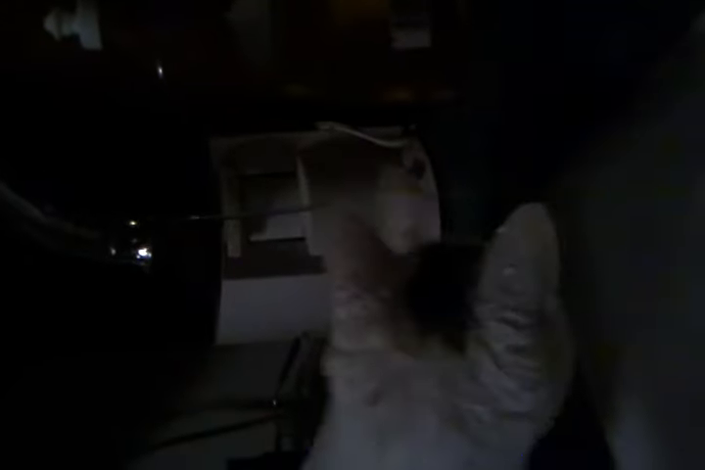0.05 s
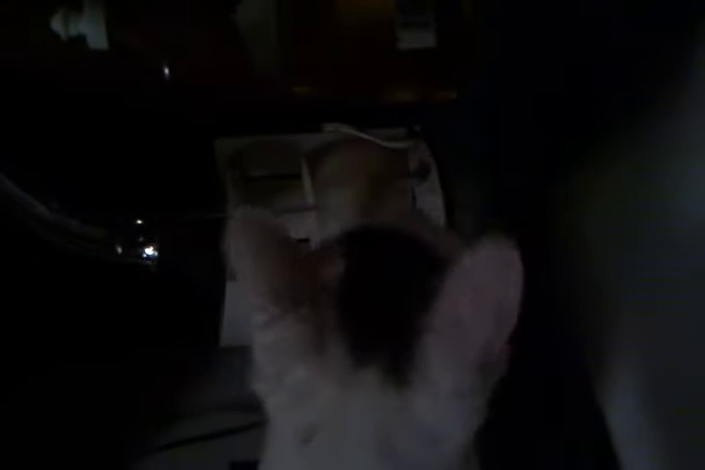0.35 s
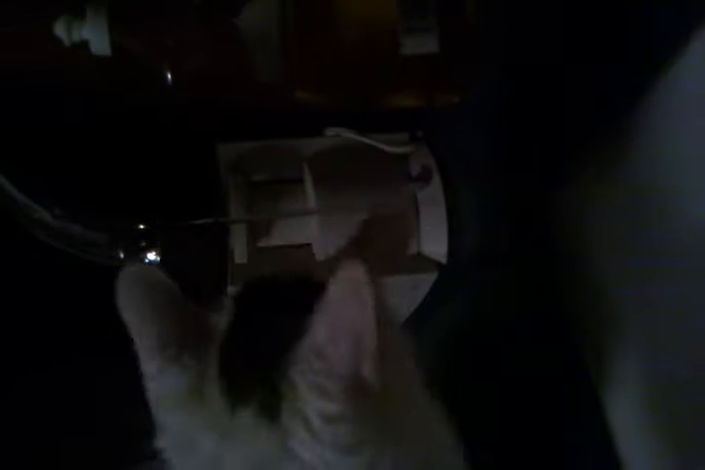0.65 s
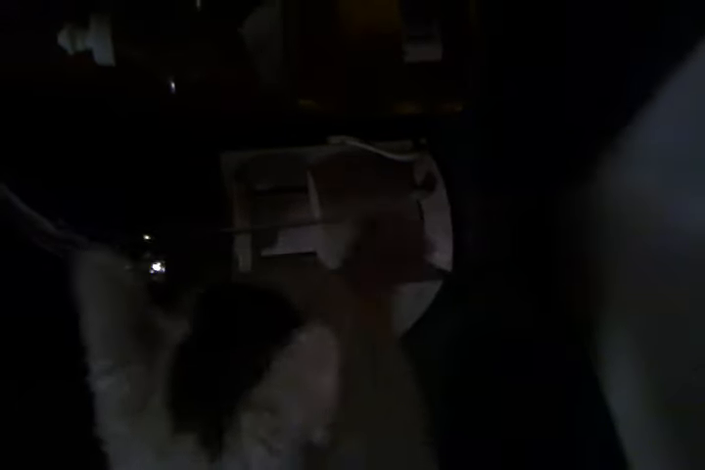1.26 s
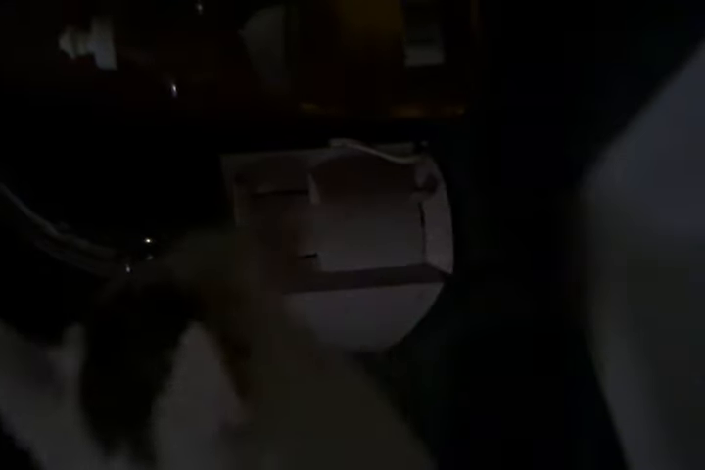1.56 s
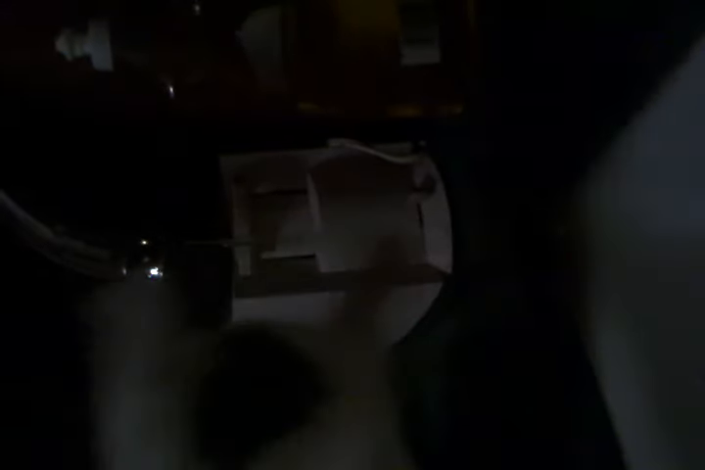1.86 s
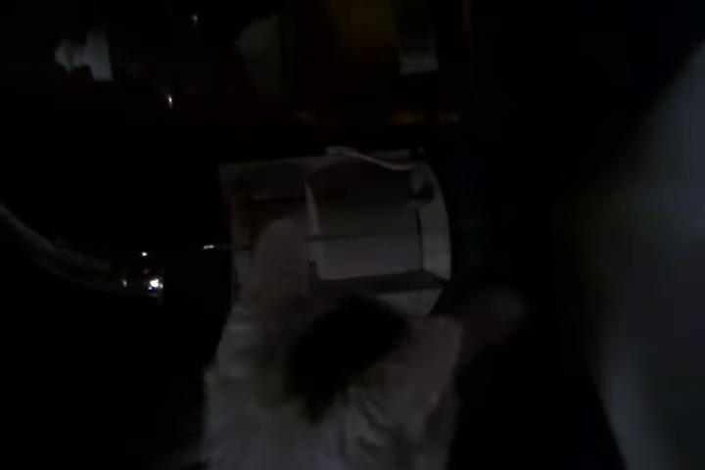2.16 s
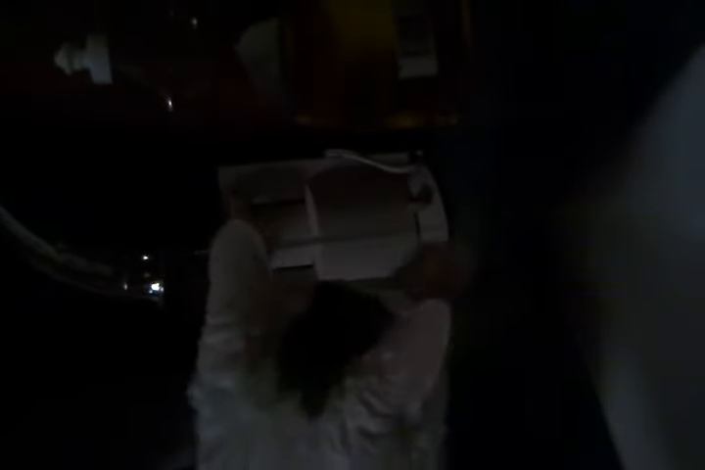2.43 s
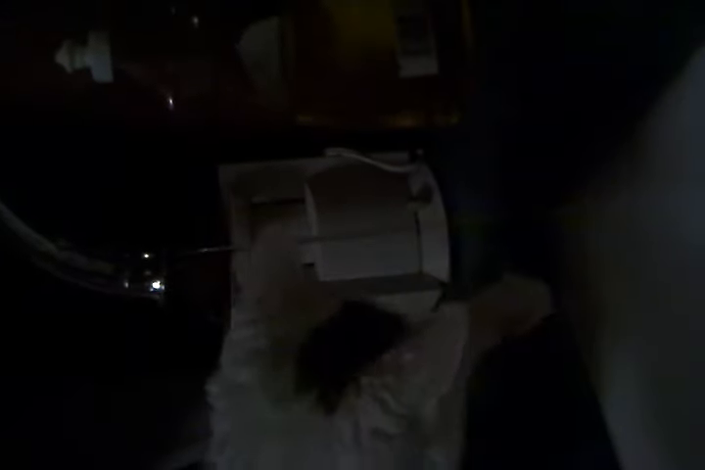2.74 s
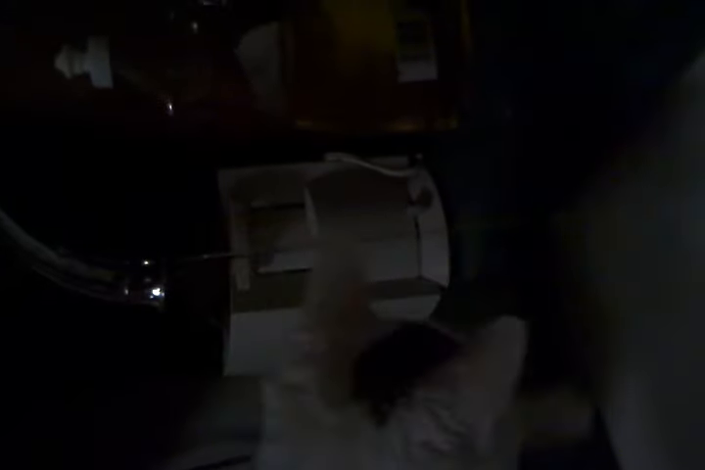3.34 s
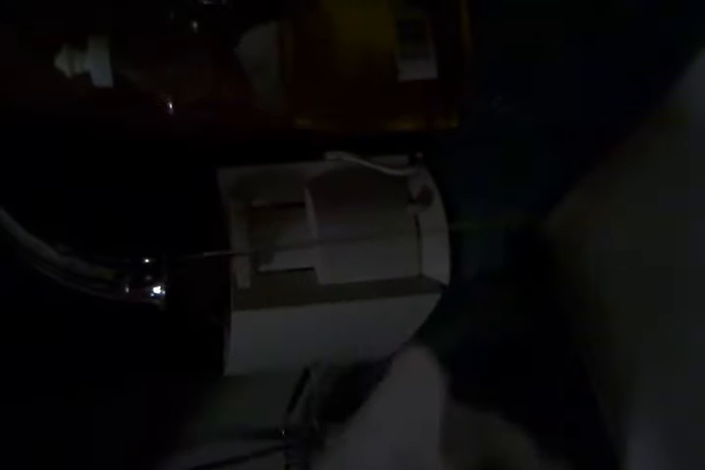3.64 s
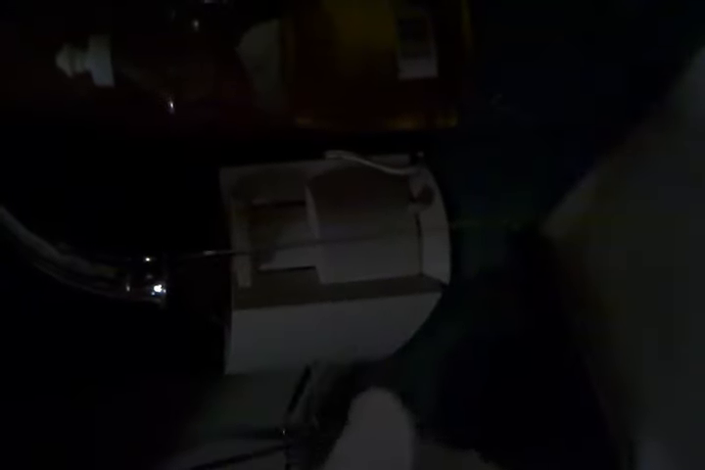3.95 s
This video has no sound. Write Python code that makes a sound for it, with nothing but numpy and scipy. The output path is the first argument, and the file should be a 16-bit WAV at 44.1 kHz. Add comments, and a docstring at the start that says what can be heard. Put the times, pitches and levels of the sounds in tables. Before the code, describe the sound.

A dripping metal tap ticks and rings faintly as a cat paws at it in a small, quiet room. Fur brushes past and dull knocks sound close by, then the cat lands on a wooden counter with a hollow thump.

```python
"""A dripping metal tap ticks and rings as a cat noses and paws at it in a small, quiet room.
Drips and light touches set the metal ringing, fur brushes past, and a few dull knocks sound.
Near the end the cat lands on the wooden counter, whose boards give a hollow thump.
A camera close by whirs and hisses faintly."""
import sys
import numpy as np
from scipy import signal
from scipy.fft import rfft, irfft
from scipy.io import wavfile
from scipy.ndimage import uniform_filter1d

SR = 44100
rng = np.random.default_rng(int(sys.argv[2]) if len(sys.argv) > 2 else 0)


def to_wav(s):
    """Save 16-bit WAV."""
    ch = np.atleast_2d(s).T  # columns
    pcm = np.round(np.clip(ch, -1, 1) * 32767)  # PCM
    wavfile.write(sys.argv[1], SR, pcm.astype(np.int16))


N = 176400

# The tones the metal tap rings at. Each row: pitch in Hz, level in dB, multiplier of the ring time.
TAP_TONES = [(5520, -4, 1), (5660, -6, .9), (6050, -5, .5), (6445, 5, .9), (6600, 0, .7), (7030, 1, 1.1),
             (7095, -2, 1.3), (7365, -4, 1.1), (7701, 1, 1.3), (8025, 1, 1.3), (8190, -1, 1),
             (8500, -4, .6), (8950, -3, .8), (9510, -4, .9), (9760, -3, 1), (10385, 1, 1.3),
             (10750, -3, .8), (11500, 0, .9), (11850, -3, .7), (12720, -3, .8), (13200, -1, .9),
             (13670, 0, 1)]
# The tone colour of splats and rubs on the tap. Each row: frequency in Hz, level in dB.
CONTACT_COLOUR = [(300, -37), (2000, -11), (2500, -11.5), (4000, -8.5), (5700, -11.5), (6500, -2.5),
                  (8000, 0), (10500, -0.5), (12000, -5), (13600, 6.5)]


def tap_ticks(rise_s=.0006, snap_t60=.0039, echo_s=.0021, basin_s=.025, basin_t60=.031):
    """Each drip or touch snaps, splats and rings the metal; a faint splash comes back from the basin."""
    # Each row: start in seconds, level in dB, centre in Hz, spread in Hz, ring time in seconds,
    # head start of the left microphone in milliseconds.
    hits = [(0.249, -42.5, 8100, 448, 0.062, 0.25), (.331, -52.5, 3960, 350, 0.021, 0.27),
            (0.339, -55.5, 3980, 350, .025, .23), (0.529, -50, 13300, 1200, 0.031, 0.26),
            (0.584, -45.5, 8200, 500, 0.045, 0.25), (.586, -46.5, 5400, 150, 0.038, 0.27),
            (0.6734, -28.5, 8150, 790, 0.0093, 0.26), (0.771, -37, 11400, 1290, 0.0089, 0.3),
            (.796, -55, 7500, 1500, 0.023, 0.4), (0.841, -53, 9000, 2000, 0.051, 0.29),
            (0.852, -55, 8800, 2000, 0.095, .28), (0.908, -46, 10300, 600, 0.048, .28),
            (0.963, -41, 10300, 700, 0.054, 0.24), (0.973, -38, 7640, 600, 0.073, 0.25),
            (1.040, -43, 13200, 600, .05, 0.34), (1.096, -50, 12200, 1950, 0.081, .28),
            (1.158, -58, 13200, 812, .05, 0.34), (1.203, -51.5, 9100, 2470, 0.02, .28),
            (1.210, -51, 8700, 2000, 0.013, 0.23), (1.3887, -32, 8500, 2000, 0.0079, 0.22),
            (1.5957, -44.5, 6440, 300, 0.07, -0.21), (1.689, -48, 12600, 1960, 0.008, .28),
            (1.7978, -29.5, 7340, 640, 0.054, -0.31), (2.009, -47.5, 8400, 2500, 0.013, 0.25),
            (2.0176, -46, 13600, 600, 0.033, 0.41), (2.0483, -39, 7130, 497, 0.076, -.2),
            (2.068, -33.5, 10400, 2860, 0.046, 0.12), (2.1735, -43, 13000, 1500, .008, 0.2),
            (2.179, -42, 6250, 650, 0.069, -0.26), (2.354, -39, 11400, 2980, 0.012, 0.25),
            (2.3668, -47, 7100, 342, 0.052, -0.28), (2.48, -42.5, 12500, 2000, 0.018, 0.25),
            (2.5333, -54, 13400, 1200, .015, 0.3), (2.629, -45, 13600, 350, 0.039, 0.23),
            (2.7, -46, 9800, 2500, 0.01, 0.14), (2.8, -45.5, 10600, 780, 0.067, .29),
            (2.929, -42, 13200, 1210, 0.013, .28), (2.967, -46.5, 11200, 2980, 0.029, 0.3),
            (2.986, -48.5, 7500, 1500, 0.022, 0.27), (3.000, -50, 9100, 2000, .02, 0.3)]
    out, t = np.zeros((2, N)), np.arange(8192) / SR
    tone_hz, tone_db, ring_scale = np.transpose(TAP_TONES)[..., None]
    for start, db, hz, spread_hz, t60, lead_ms in hits:
        # Tones near the tick's centre ring loudest, with a little chance in level and tuning.
        chance, detune, phase = rng.standard_normal((3, len(TAP_TONES), 1))
        weights = amp(tone_db + 2 * chance) * bump(tone_hz, hz, spread_hz)
        weights *= np.sqrt(2) / np.linalg.norm(weights)
        tones = np.sin(2 * np.pi * (tone_hz * (1 + .001 * detune) * t + phase))
        ring = (weights * tones * fade(t / ring_scale, t60)).sum(0)

        uneven_db = 4 * wander(len(t) // 2 + 1, smooth=50)
        splats = noise((3, len(t)), lambda f: contact(f, hz, spread_hz) * amp(uneven_db)) * fade(t, t60)
        snap = noise(len(t), lambda f: contact(f, hz, spread_hz=730)) * fade(t, snap_t60)
        basin = noise((2, len(t)), lambda f: bump(f, hz, spread_hz) * bump(f, 9400, 2300) ** 2)

        onset = amp(db) * np.minimum(t / rise_s, 1)
        ringing = bump(spread_hz, 0, 1100)  # ticks with a wide spread splash more than they ring
        direct = onset * (ringing * ring + amp(-3.5) / np.sqrt(ringing) * splats[2] + amp(1) * snap)
        lean_left_db = .7 - 2.7 * lead_ms
        for ear, side in enumerate((-1, 1)):
            add(out[ear], start + side * lead_ms / 2000, amp(-side * lean_left_db) * direct)
        add(out, start + echo_s, amp(-8) * onset * splats[:2])
        add(out, start + basin_s, amp(-28) * onset * basin * fade(t, basin_t60))
    return out + amp(-13) * room(out)


def spout_plinks(low_hz=3523, high_hz=4580, partner_hz=3400, bend_s=.004, rise_s=.005, lead_s=.00026):
    """A touch rings the spout on two clear notes that bend up into tune, plus a short, lower partner."""
    # Each row: start in seconds, level of the low note in dB, level of the high note in dB.
    touches = [(0.583, -65, -61), (0.863, -46.5, -70), (1.799, -61.5, -58), (2.097, -55.5, -49),
               (2.180, -64, -58.5)]
    out, t = np.zeros((2, N)), np.arange(SR // 4) / SR
    flat_hz = 130 * np.exp(-t / bend_s)
    for start, low_db, high_db in touches:
        notes = amp(low_db) * glide(low_hz - flat_hz) + amp(high_db) * glide(high_hz - flat_hz)
        partner = amp(low_db + 1) * np.sin(2 * np.pi * partner_hz * t)
        plink = notes * fade(t, t60=.1) + partner * fade(t, t60=.057)
        for ear in (0, 1):
            add(out[ear], start + ear * lead_s, plink * np.minimum(t / rise_s, 1))
    return out + amp(-11) * room(out)


def fur_brushes(grain_db=4):
    """Fur and paws rub past in soft swells of grainy friction, mixed with tiny pitched ticks."""
    # Each row: middle in seconds, half length in seconds, level in dB, centre in Hz, spread in Hz.
    strokes = [(0.344, 0.019, -64.5, 5940, 3000), (.497, .007, -61, 13000, 1200),
               (0.587, 0.016, -53.5, 6300, 2460), (0.908, 0.022, -54, 9700, 1320),
               (1.378, 0.0056, -60, 4450, 500), (1.430, 0.038, -58.5, 7400, 2020),
               (1.638, 0.017, -55.5, 5850, 3000), (1.977, 0.022, -54.5, 9000, 3000),
               (2.086, 0.024, -47.5, 8900, 2970), (2.247, 0.048, -59.5, 8400, 3540),
               (2.305, 0.0087, -57, 8500, 700), (2.743, 0.014, -56, 7750, 3500),
               (2.996, 0.018, -56, 9400, 1980), (3.107, 0.014, -58.5, 7400, 800),
               (3.391, 0.018, -52, 3700, 1440), (3.467, 0.028, -52.5, 8500, 3720),
               (3.587, 0.065, -60.5, 3830, 1980), (3.728, 0.011, -59, 7860, 1000)]
    out, t = np.zeros((2, N)), np.arange(-8192, 8192) / SR
    for middle, half_s, db, hz, spread_hz in strokes:
        clumps = np.minimum(wander(len(t), smooth=40), 2)
        grains = unit(rng.standard_normal((2, len(t))) * amp(grain_db * clumps))
        droplets = unit(np.array([spatter(len(t)), spatter(len(t))]))
        rub = unit(colour(grains + amp(-1) * droplets, lambda f: contact(f, hz, spread_hz)))
        swell = np.exp(-.5 * (t / half_s) ** 2)
        add(out, middle + t[0], amp(db) * rub * swell)
    return out


def spatter(length, drops_per_s=50):
    """Tiny droplets ring the tap at random moments; each tone gets its own stream of drops."""
    chance, size = rng.random((2, len(TAP_TONES), length))
    clicks = (chance < drops_per_s / SR) * (.3 + size)
    t = np.arange(1024) / SR
    rings = np.array([np.sin(2 * np.pi * hz * t) * fade(t, t60=.014) for hz, _, _ in TAP_TONES])
    return signal.fftconvolve(clicks, rings, axes=1).sum(0)[:length]


def cat_landing(rise_s=.00099):
    """Paws and body hit the counter in quick succession: padded thuds that ring the boards."""
    # Each row: start in seconds, level in dB, frequency in Hz above which the blow is muffled.
    blows = [(3.37, -41.5, 2500), (3.380, -31.5, 2630), (3.3875, -31.5, 2300), (3.393, -30, 2000),
             (3.403, -28, 1500), (3.418, -37.5, 1300), (3.435, -43.5, 1200), (3.511, -34, 480),
             (3.536, -43.5, 347), (3.570, -51, 1000), (3.645, -60.5, 1000)]
    # The tone colour of a thud. Each row: frequency in Hz, level in dB.
    thud_colour = [(40, -46), (70, -22), (105, -10.5), (200, -4.5), (300, -19), (400, 2), (760, -11),
                   (1260, -9.5), (1500, -16.5), (2000, -15.5), (2300, -24.5), (4000, -15.5), (6000, -27)]
    out, t = np.zeros((2, N)), np.arange(SR // 2) / SR
    for start, db, dull_hz in blows:
        thud, side = noise((2, len(t)), lambda f: amp(read(thud_colour, f))) * fade(t, t60=.11)
        blow = amp(-2) * thud + amp(-5) * counter_ring(start, t) + amp(-6.5) * np.array([side, -side])
        blow *= np.minimum(t / rise_s, 1)
        add(out, start, amp(db) * signal.lfilter(*signal.butter(2, dull_hz, fs=SR), blow))
    out = low_cut(out, hz=86)
    return (out + amp(-9) * room(out)) * amp([[-1], [1]])  # a little louder on the right


def counter_ring(start, t):
    """The wooden boards ring in step with earlier blows; each microphone hears its own mix of tones."""
    # Each row: pitch in Hz, level in dB, ring time in seconds, left level over right in dB,
    # head start of the left wave in radians.
    board_tones = [(105, -16, .25, -7, -.2), (151, -13, .22, -5, -.5), (198, -4, .27, 2, 1.9),
                   (248, -11, .15, 2, 1.1), (398, 7, .09, -1, -.3), (462, -4, .09, 5, -3.1),
                   (513, 0, .1, -2, -1.1), (656, 0, .08, 0, -.4), (704, -5, .1, -10, -.3),
                   (820, -7, .1, 0, .5), (903, 0, .085, 2, 0), (985, -25, .6, -1, -.2),
                   (1119, -7, .09, 0, .4), (1285, -1, .08, 0, -.1)]
    ears, ring = np.array([[.5], [-.5]]), 0
    for hz, db, t60, left_db, lead in board_tones:
        wave = np.sin(2 * np.pi * hz * (start + t) + ears * lead)
        ring += amp(db + ears * left_db) * wave * fade(t, t60)
    return ring / strength(board_tones)


def dull_knocks(dull_hz=2600):
    """Short, dry knocks close to the microphones, each striking the same few tones."""
    # Each row: start in seconds, level in dB.
    hits = [(0.889, -58), (1.4778, -38.5), (1.481, -51.5), (2.129, -57), (2.732, -54), (2.7368, -56),
            (2.742, -57)]
    # The tones of a knock. Each row: pitch in Hz, level in dB, ring time in seconds.
    knock_tones = [(260, -5, 0.019), (482, 11.5, 0.035), (840, 5.5, 0.012), (1267, 4.5, 0.013),
                   (1616, 5.5, 0.025), (1700, -19, 0.6), (2050, -14, 0.025)]
    out, t = np.zeros(N), np.arange(8192) / SR
    knock = sum(amp(db) * np.sin(2 * np.pi * hz * t) * fade(t, t60) for hz, db, t60 in knock_tones)
    for start, db in hits:
        add(out, start, -amp(db) * knock / strength(knock_tones))
    out = signal.sosfilt(signal.butter(4, dull_hz, fs=SR, output="sos"), low_cut(out, hz=188))
    return out + amp(-11) * room(out)


def camera_whir(whir_db=-68.5):
    """The camera's motor makes a low whir and three thin, wavering tones."""
    # The tone colour of the whir. Each row: frequency in Hz, level in dB.
    whir_colour = [(18, -83), (30, -45), (75, -23), (94, -3.5), (187, -1.5), (494, -3), (584, -3.5),
                   (653, -3), (730, -5), (1040, -5), (1490, -5), (2040, -10.5), (2600, -15.5), (3380, -30),
                   (5720, -120)]
    # How wide the whir sounds. Each row: frequency in Hz, level of the sides over the middle in dB.
    whir_width = [(60, 22), (130, 10.5), (290, 9.5), (630, 0.5), (1100, -7.5), (1450, -34), (1800, -13.5),
                  (2500, 11.5)]
    # The motor's tones. Each row: pitch in Hz, level in dB, size of the waver in Hz.
    whines = [(1022, -78.5, 2.78), (2044, -86, 4.5), (7205, -75.5, 21)]
    mid, side = noise((2, N), lambda f: amp(read(whir_colour, f)))
    side = colour(side, lambda f: amp(read(whir_width, f)))
    waver = wander(N, smooth=900)
    tones = sum(amp(db) * glide(hz + waver_hz * waver) for hz, db, waver_hz in whines)
    return amp(whir_db) * np.array([mid + side, mid - side]) + tones


def microphone_hiss(hiss_db=-65.5, top_hz=14000):
    """The microphones add a faint, high hiss that flickers slightly in patches."""
    # The tone colour of the hiss. Each row: frequency in Hz, level in dB.
    hiss_colour = [(2500, -19), (3600, -5), (5000, -5.5), (5900, -18.5), (7200, 1.5), (8800, -7),
                   (10300, -1), (11900, -9.5), (13500, -1)]
    hz, _, bands = signal.stft(rng.standard_normal((2, N)), SR, nperseg=512)
    patches = uniform_filter1d(rng.standard_normal(bands.shape[1:]), size=7, axis=0)
    flicker_db = unit(uniform_filter1d(patches, size=12, axis=1))
    gain = (hz < top_hz)[:, None] * amp(read(hiss_colour, hz)[:, None] + flicker_db)
    hiss = signal.istft(bands * gain, SR, nperseg=512)[1][:, :N]
    return amp(hiss_db) * unit(hiss)


def room(x):
    """The small room answers a sound with scattered echoes that die faster in the treble."""
    # Each row: frequency in Hz, seconds the echoes take to fade by 60 dB.
    fade_times = [(100, 0.6), (400, 0.3), (1500, 0.41), (7000, 0.19), (14000, 0.24)]
    shape = (2, SR // 2)
    echoes = rng.standard_normal(shape) * (rng.random(shape) < .2)
    echoes[:, :SR // 250] = 0  # no echo in the first 4 milliseconds
    hz, t, bands = signal.stft(echoes, SR, nperseg=256)
    tail = signal.istft(bands * amp(-60 * t / read(fade_times, hz)[:, None]), SR, nperseg=256)[1]
    return signal.fftconvolve(np.atleast_2d(x), tail / np.linalg.norm(tail[0]), axes=1)[:, :N]


def amp(db):
    """Turns decibels into a multiplier."""
    return 10 ** (np.asarray(db) / 20)


def unit(x):
    """Scales a signal to an average strength (rms) of 1."""
    return x / np.sqrt(np.mean(x ** 2) + 1e-30)


def strength(tones):
    """The combined strength (rms) of a table of tones before they fade."""
    return np.sqrt(sum(amp(tone[1]) ** 2 for tone in tones) / 2)


def fade(t, t60):
    """Dies away by 60 dB in t60 seconds, the ring time."""
    return np.exp(-np.log(1000) * t / t60)


def glide(hz):
    """A pure tone of strength 1 that follows a changing pitch."""
    return np.sqrt(2) * np.sin(2 * np.pi * np.cumsum(hz) / SR)


def wander(length, smooth):
    """A random curve of strength 1, averaged over `smooth` points."""
    return unit(uniform_filter1d(rng.standard_normal(length), size=smooth))


def noise(shape, gain):
    """Noise of strength 1 with the tone colour given by `gain`."""
    return unit(colour(rng.standard_normal(shape), gain))


def colour(x, gain):
    """Turns each frequency f in x up or down by gain(f)."""
    return irfft(rfft(x) * gain(np.fft.rfftfreq(x.shape[-1], 1 / SR)), x.shape[-1])


def read(points, hz):
    """Reads between a table's rows, with octaves evenly spaced."""
    f, value = np.transpose(points)
    return np.interp(np.log(hz + 1), np.log(f + 1), value)


def bump(f, hz, spread_hz):
    """A broad resonance: strongest at hz, weaker to either side."""
    return 1 / np.sqrt(1 + ((f - hz) / spread_hz) ** 2)


def contact(f, hz, spread_hz):
    """The tone colour of a splat or rub, favouring frequencies near hz."""
    return bump(f, hz, spread_hz) * amp(read(CONTACT_COLOUR, f))


def low_cut(x, hz):
    """Steeply cuts the bass below hz."""
    return signal.sosfilt(signal.butter(6, hz, "high", fs=SR, output="sos"), x)


def add(mix, start, sound):
    """Mixes a sound in at `start` seconds."""
    part = mix[..., max(round(start * SR), 0):][..., :sound.shape[-1]]
    part += sound[..., :part.shape[-1]]


def scene():
    """The tap, the cat and the camera's own noise."""
    tap = tap_ticks() + spout_plinks()
    return tap + fur_brushes() + cat_landing() + dull_knocks() + camera_whir() + microphone_hiss()


def record(dry, notch_hz=2935, notch_db=-24, step_hz=13760, step_db=-29, top_hz=15289):
    """The camera cuts a deep notch in the upper middle, turns the top treble down, then cuts it off."""
    notched = colour(dry, lambda f: amp(notch_db * np.exp(-np.abs((f - notch_hz) / 327) ** 3)))
    dulled = colour(notched, lambda f: amp(step_db * (1 + np.tanh((f - step_hz) / 52)) / 2))
    high_cut = signal.firwin(301, top_hz, window=("kaiser", 7), fs=SR)
    return signal.oaconvolve(dulled, high_cut[None], "same")


dry = scene()
out = record(dry)
to_wav(out)
```